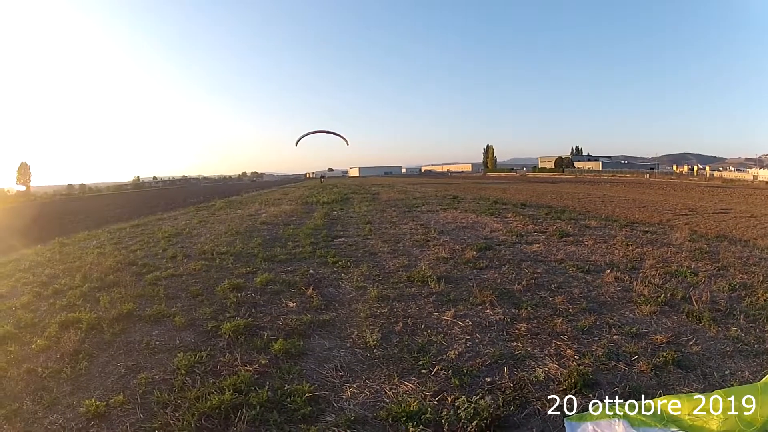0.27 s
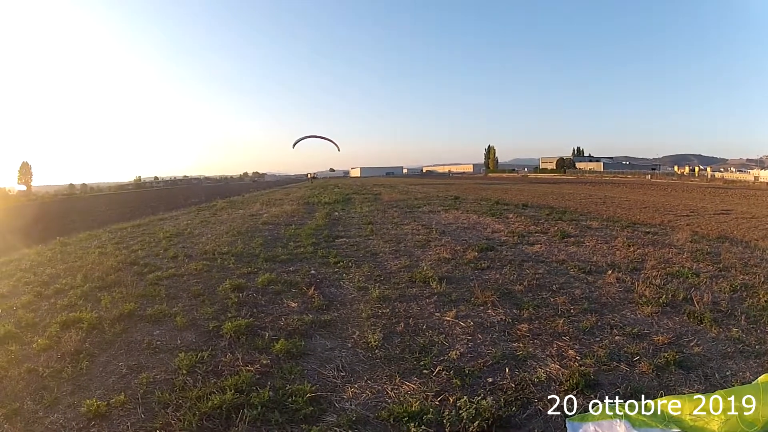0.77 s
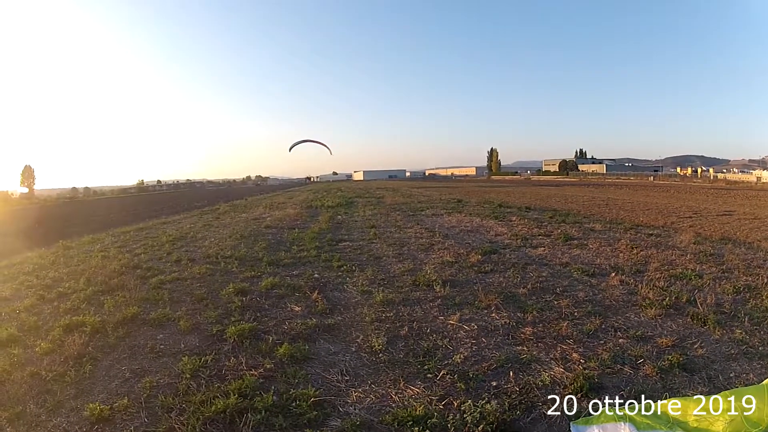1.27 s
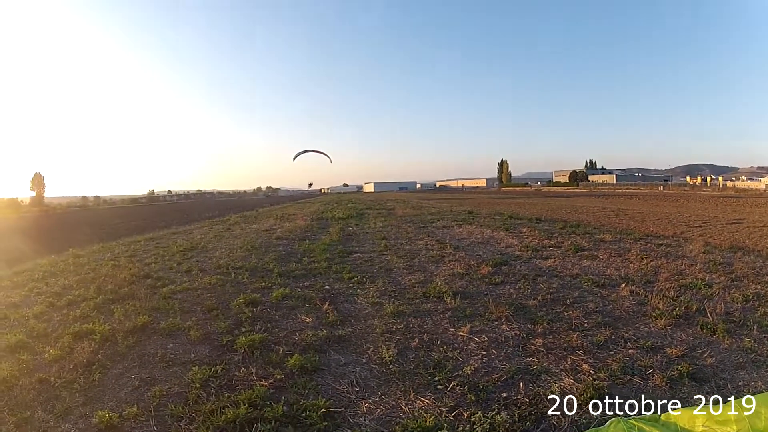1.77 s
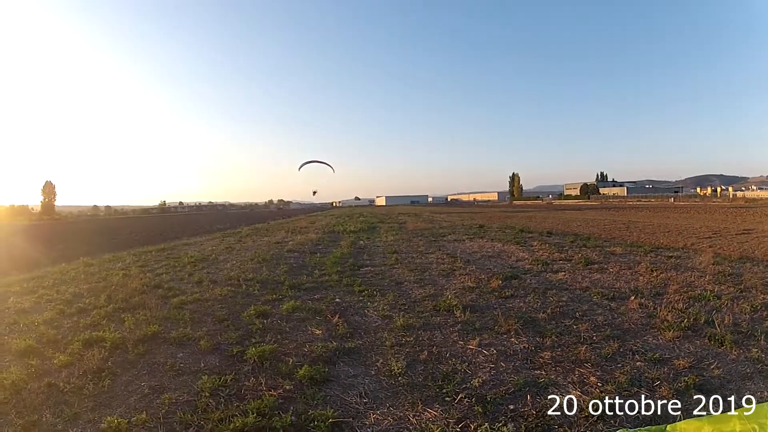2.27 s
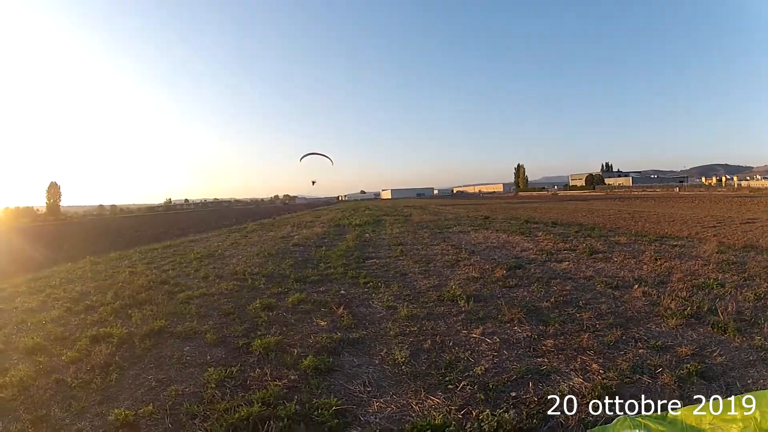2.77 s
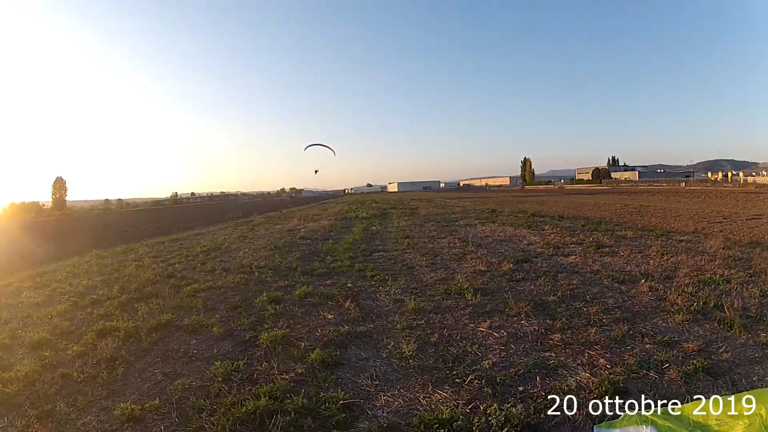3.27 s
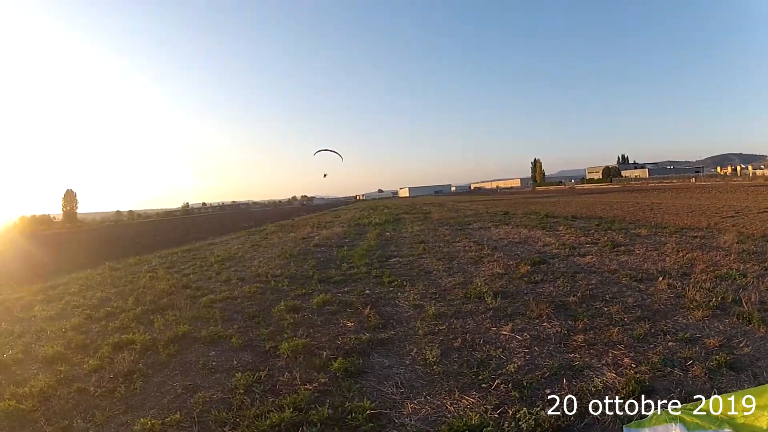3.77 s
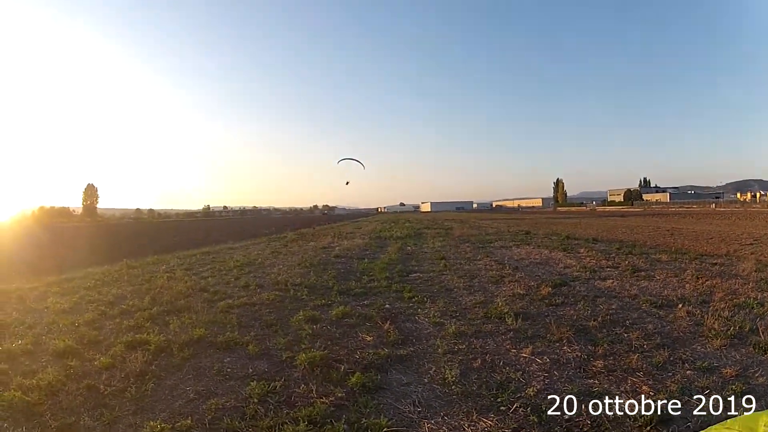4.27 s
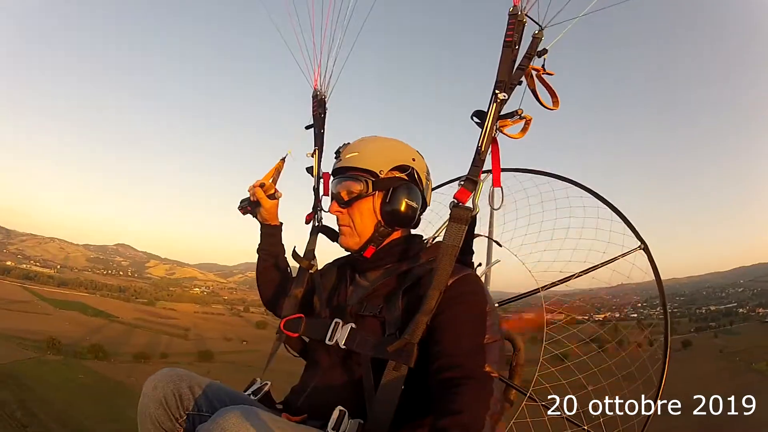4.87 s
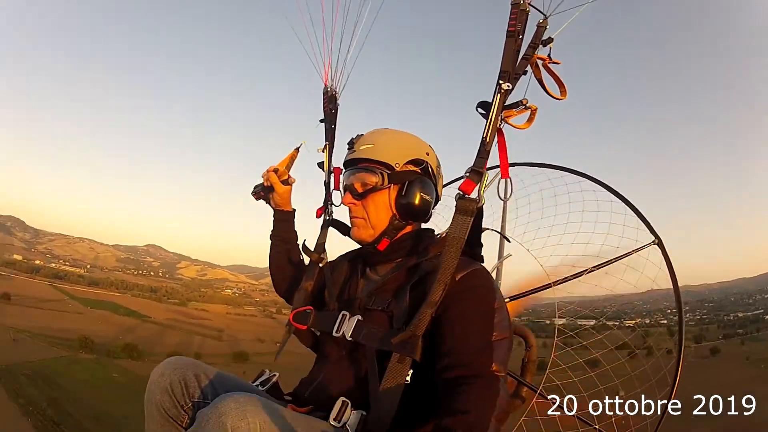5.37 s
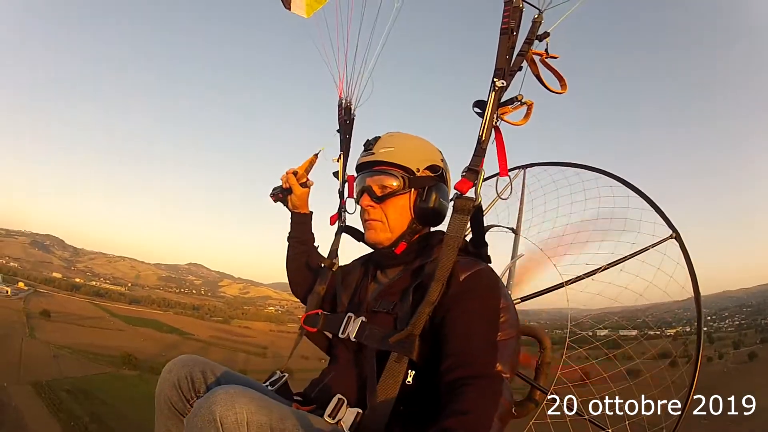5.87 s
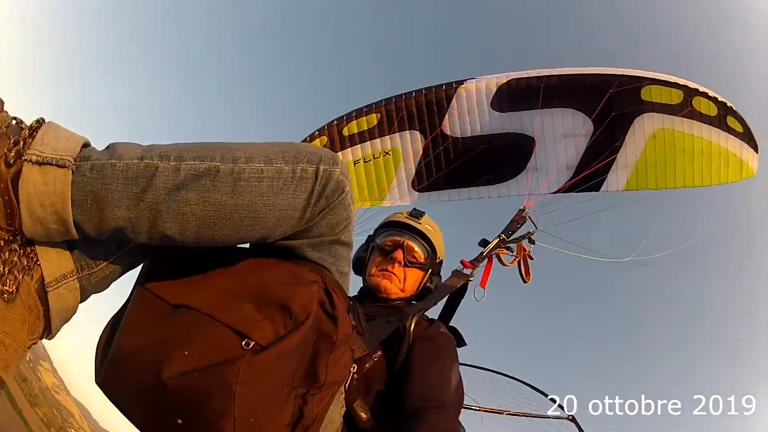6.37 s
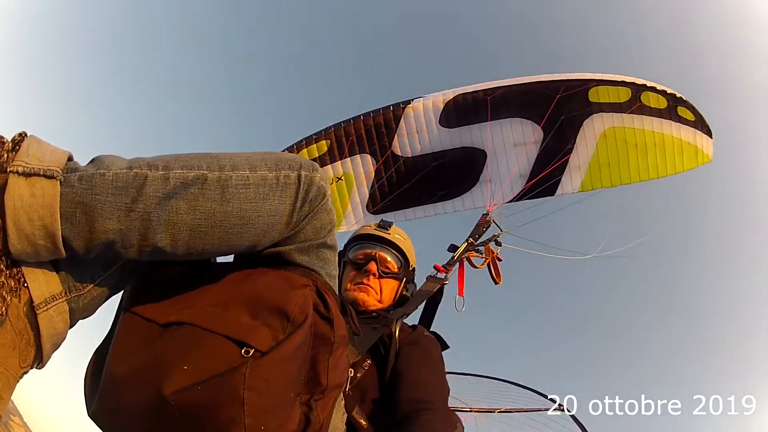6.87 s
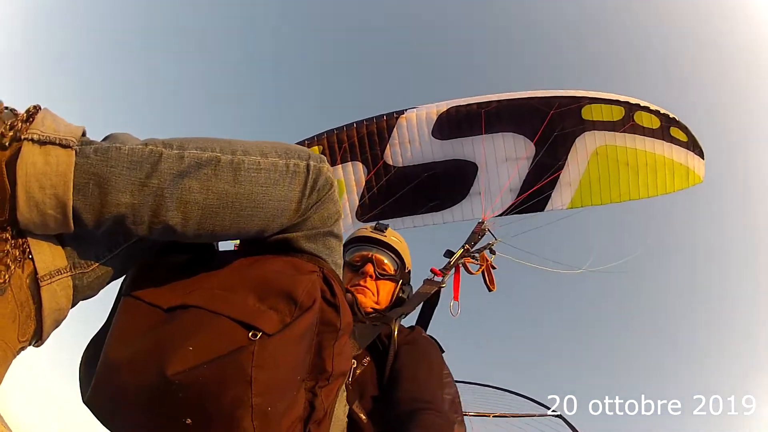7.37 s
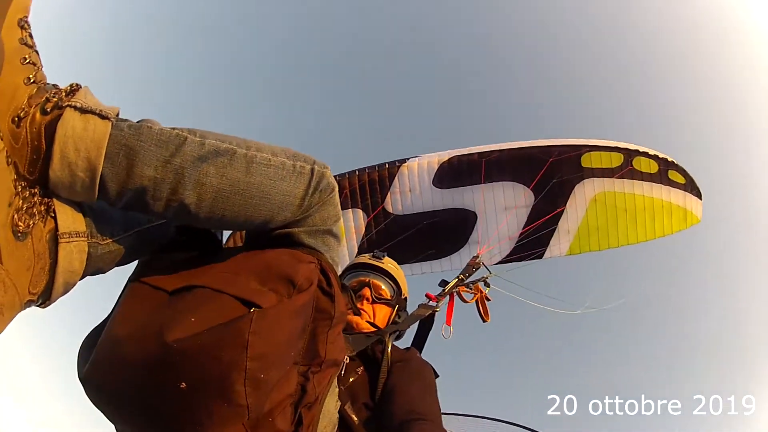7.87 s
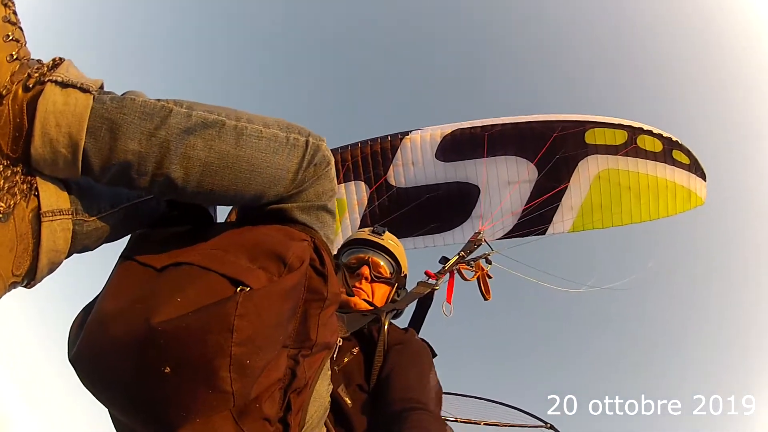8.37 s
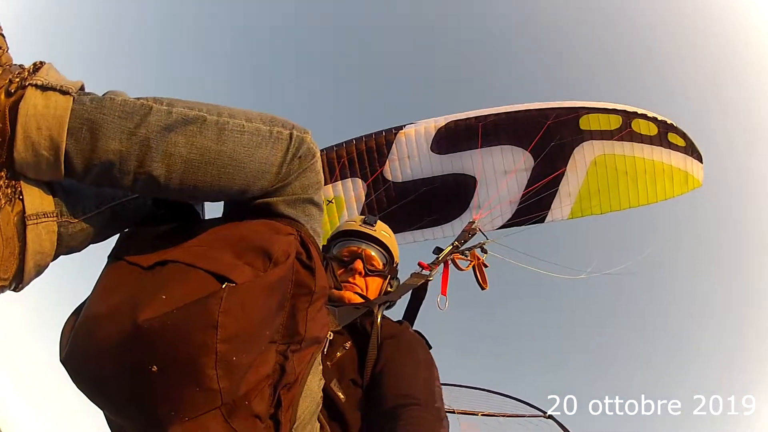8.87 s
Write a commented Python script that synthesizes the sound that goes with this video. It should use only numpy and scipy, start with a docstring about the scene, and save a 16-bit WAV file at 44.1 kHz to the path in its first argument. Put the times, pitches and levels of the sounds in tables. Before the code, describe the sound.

A paramotor's raspy propeller buzz recedes across an open field, easing in pitch, then cuts abruptly to a loud steady engine roar close up.

```python
"""A paramotor propeller, heard from a field as it flies off and eases the throttle; then, abruptly, on board,
first beside the pilot, then from below the seat. A two-stroke engine drives two blades through a reduction.
Each blade pass gives a pressure pulse, summed from harmonic orders, and bursts of torn air, made of noise
with an envelope locked to the blades; the exhaust note is chopped by the blades. A light breeze lies under
the field. The loudest peaks are flattened and a fixed tone colour is laid on the whole."""
import sys
import numpy as np
from scipy import signal
from scipy.fft import rfft, irfft
from scipy.io import wavfile

SR = 44100
rng = np.random.default_rng(int(sys.argv[2]) if len(sys.argv) > 2 else 0)


def generate_wav(signal):
    """Clip the signal to [-1, 1] and save it as 16-bit WAV at the path in sys.argv[1]."""
    frames = np.transpose(np.atleast_2d(signal))
    scaled = np.clip(frames, -1, 1) * 32767
    pcm = np.round(scaled).astype(np.int16)
    wavfile.write(sys.argv[1], SR, pcm)


N = 402191
TIME = np.arange(N) / SR   # s
BINS = np.maximum(np.fft.rfftfreq(N, 1 / SR), 1)   # Hz
BOARD_S, BELOW_S = 4.565, 6.241   # starts of the positions beside the pilot and below the seat
FIRINGS_PER_PASS_FIELD, FIRINGS_PER_PASS_BOARD = 1.464, 1.8

# course of the blade rasp from the field, before each layer's own offset: time_s, level_db
RASP_COURSE = [(0, -26.5), (0.45, -26.5), (1.1, -32.3), (2.05, -28), (2.5, -30), (2.8, -33.5), (3.3, -35),
               (3.9, -41), (4.55, -40)]


def amp(db):
    """Logarithmic level: decibels to amplitude gain."""
    return 10 ** (np.asarray(db) / 20)


def rms_one(x):
    """Normalisation by effective value: scale to unit rms."""
    return x / np.sqrt(np.mean(x ** 2) + 1e-20)


def in_time(rows):
    """Linear interpolation: the value column of a time curve at every sample."""
    s, value = np.transpose(rows)
    return np.interp(TIME, s, value)


def band(x, hz, kind):
    """Frequency selection by a Butterworth filter."""
    return signal.sosfilt(signal.butter(4, hz, kind, fs=SR, output="sos"), x)


def drift(rate):
    """Slow random modulation: unit-rms chance values, rate per second, joined by straight lines."""
    knots = rng.standard_normal(4000)
    return rms_one(np.interp(TIME * rate, np.arange(len(knots)), knots))


def coloured(white, spectrum):
    """Spectral shaping: give flat noise of unit rms a power density in dB per Hz."""
    hz, db = np.transpose(spectrum)
    density_db = np.interp(np.log(BINS), np.log(hz), db)
    return irfft(rfft(white) * amp(density_db), N) * np.sqrt(SR / 2)


def carved(x, bells):
    """Spectral colouring: bell-shaped dips and peaks over frequency."""
    db = sum(depth * np.exp(-.5 * ((BINS - hz) / width) ** 2) for hz, width, depth in bells)
    return irfft(rfft(x) * amp(db), N)


def ground_bounce(x, lag_ms, strength):
    """Comb-filter interference: the direct sound plus its slightly later echo off the field."""
    return irfft(rfft(x) * (1 + strength * np.exp(-2j * np.pi * BINS * lag_ms / 1000)), N)


def repeat(cycle, turns):
    """Periodicity: play one cycle once per turn."""
    return np.interp(turns % 1 * len(cycle), np.arange(len(cycle) + 1), np.append(cycle, cycle[0]))


def orders(table, turns, scatter, waver_db, swells=()):
    """Fourier synthesis of suction pulses: higher orders arrive less in step, and each wavers."""
    out = 0
    for order, db in table:
        db = db + waver_db * drift(9)
        for swell_order, s, width, rise_db in swells:
            if swell_order == order:
                db = db + rise_db * np.exp(-.5 * ((TIME - s) / width) ** 2)
        phase = rng.normal() * scatter * (order - 1)
        out = out - amp(db) * np.cos(2 * np.pi * order * turns + phase)
    return np.sqrt(2) * out   # an order at 0 dB has unit rms


def bursts(turns, depth_db, sharp, uneven_db):
    """Cyclic amplitude modulation: one swell per turn, each of its own strength; unit rms."""
    strength = rng.standard_normal(2000)[np.round(turns).astype(int)]
    swell = np.abs(np.cos(np.pi * turns)) ** (2 * sharp)
    return rms_one(amp(swell * (depth_db + uneven_db * strength)))


def torn_air(turns, alike, buzz_hz):
    """Partly coherent turbulence: flat noise whose power share alike, below buzz_hz, repeats every pass."""
    cycle = irfft(np.exp(2j * np.pi * rng.random(321)))
    repeated = rms_one(repeat(cycle, turns))
    fresh = rng.standard_normal(N)
    share = alike / (1 + (BINS / buzz_hz) ** 4)
    return irfft(rfft(fresh) * np.sqrt(1 - share) + rfft(repeated) * np.sqrt(share), N)


def receding(first_db, on_course_db):
    """Directivity and distance: a low tone shifts as the machine turns onto its course, then fades."""
    on_course_s, fade_db_per_s = 1.6, 3
    turn_db = np.interp(TIME, [0, on_course_s], [first_db, on_course_db])
    return amp(turn_db - fade_db_per_s * np.maximum(TIME - on_course_s, 0))


def breeze():
    """Low-frequency wind noise: a faint band of noise with a drifting level."""
    return amp(-58 + 3 * drift(3)) * rms_one(band(rng.standard_normal(N), [20, 70], "band"))


def field_exhaust(passes):
    """Amplitude modulation of a tone: the blades chop the exhaust note, which throws sum tones."""
    chop = 2 * np.pi * passes
    note = chop * FIRINGS_PER_PASS_FIELD
    tones = np.cos(note) + amp(-19) * np.cos(note + chop) + amp(-20) * np.cos(note + 2 * chop)
    return np.sqrt(2) * receding(first_db=-25.2, on_course_db=-27) * tones


def field_air(passes, far):
    """Modulated turbulence: rumble, rasp and hiss that flutter twice per blade pass, over a ground echo."""
    # relative spectra of the torn air, near and far: frequency_hz, density_db_per_hz
    air_near = [(25, -73), (60, -71), (130, -63), (250, -60), (430, -62.5), (750, -48), (1050, -52),
                (1600, -53), (2200, -62), (2700, -62), (3300, -71.5), (5000, -79), (7500, -83.5),
                (9700, -73), (14700, -78)]
    air_far = [(25, -83), (60, -86), (130, -74.5), (250, -69), (430, -68), (750, -56), (1050, -59),
               (1600, -76), (2200, -63), (2700, -74.5), (3300, -76.5), (5000, -85), (7500, -89),
               (9700, -79.5), (14700, -86.5)]
    # dips in the far torn air: frequency_hz, width_hz, gain_db
    far_dips = [(4200, 150, -5.5), (8000, 140, -3), (10580, 200, -28), (13400, 150, -20)]
    # course of the hiss, before its offset: time_s, level_db
    hiss_course = [(0, -24.5), (0.55, -29), (1.1, -32.5), (1.6, -29.5), (2.1, -32.5), (2.8, -31),
                   (3.4, -32), (3.7, -36), (4.55, -41.5)]
    rasp_db, hiss_db = in_time(RASP_COURSE), in_time(hiss_course)

    # a strong and a weak burst per pass, more clear-cut as the machine draws away
    depth_db = 11 + 6 * far
    strong = bursts(passes, depth_db, sharp=2.4, uneven_db=1.2)
    weak = bursts(passes + .5, depth_db, sharp=3.0, uneven_db=2.2)
    air = torn_air(passes, alike=.42, buzz_hz=3000) * (strong + .47 * weak)

    # the bounce path shortens with distance
    near = ground_bounce(coloured(air, air_near), lag_ms=1.023, strength=0.54)
    distant = ground_bounce(carved(coloured(air, air_far), far_dips), lag_ms=0.904, strength=0.35)
    air = (1 - far) * near + far * amp(5) * distant

    rumble = amp(rasp_db / 2 - 18.5) * rms_one(band(air, 377, "low"))
    rasp = amp(rasp_db - 5.5) * rms_one(band(air, [450, 1500], "band"))
    hiss = amp(hiss_db + 0.77) * rms_one(band(air, 1916, "high"))
    return rumble + rasp + hiss


def field_blades(passes, far):
    """Harmonic radiation of a propeller: low orders thrum, upper orders buzz along with the rasp."""
    # low blade orders: order, first_db, on_course_db
    thrum_orders = [(1, -31.5, -28), (2, -36.5, -28.5), (3, -22.5, -27.5)]
    # upper blade orders, near and far, relative to the buzz gain: order, level_db
    orders_near = [(4, -9.5), (5, -9.5), (6, -59), (7, -11), (8, -11), (9, -7), (10, -18), (11, -16),
                   (12, -15), (13, -14), (14, -33)]
    orders_far = [(4, -3.5), (5, -8), (6, -7.5), (7, -20.5), (8, -10), (9, -3), (10, -18.5), (11, -10.5),
                  (12, -21), (13, -17.5), (14, -21)]
    # orders that swell or fade as the disc turns against the listener: order, centre_s, width_s, rise_db
    swells = [(5, 0.11, 0.29, 6.5), (10, 0.19, 0.25, 17), (7, 0.89, .13, -16), (4, 1.1, 0.41, 6),
              (8, 1.3, 0.27, -2), (7, 1.64, 0.48, 8.5), (9, 2.2, 0.34, 3), (6, 2.1, 0.34, -8),
              (2, 2.57, .06, -13), (11, 2.7, 0.21, 11), (5, 2.68, 0.13, -15), (6, 3, 0.17, 6),
              (2, 3.03, 0.11, -26), (9, 3.22, 0.19, -12), (4, 3.44, 0.35, 5.5), (2, 3.62, 0.066, -19),
              (6, 3.53, 0.22, -12), (2, 4.26, .17, -14)]

    thrum = 0
    for order, first_db, on_course_db in thrum_orders:
        tone = orders([(order, 0)], passes, scatter=0.1, waver_db=0.63, swells=swells)
        thrum = thrum + receding(first_db, on_course_db) * tone

    near = orders(orders_near, passes, scatter=0.3, waver_db=1.44, swells=swells)
    distant = orders(orders_far, passes, scatter=0.38, waver_db=-0.5, swells=swells)
    buzz = np.sqrt(1 - far) * near + np.sqrt(far) * distant
    return thrum + amp(in_time(RASP_COURSE) - 3.5) * buzz


def from_field(passes):
    """Superposition at a distant listener: breeze, exhaust, torn air and blade tones."""
    far = np.interp(TIME, [1.6, 2.5], [0, 1])   # crossfade from near to far
    return breeze() + field_exhaust(passes) + field_air(passes, far) + field_blades(passes, far)


def board_exhaust(passes, table, level_db):
    """Modulated harmonic source: exhaust orders at the firing rate, chopped by the blades."""
    firings = passes * FIRINGS_PER_PASS_BOARD
    chop = 1 + .5 * np.cos(2 * np.pi * passes)
    return amp(level_db) * orders(table, firings, scatter=1.31, waver_db=0.5) * chop


def board_air(passes, spectrum, roar_db, hiss_db, swish_db, crack_db, alike):
    """Near-field turbulence: a roaring wake and a swish at every blade pass."""
    wake = rng.standard_normal(N) * bursts(passes, depth_db=3.5, sharp=0.75, uneven_db=1.1)
    wake = wake * amp(0.93 * drift(16))
    roar = amp(roar_db) * band(coloured(wake, spectrum), 1184, "low")

    # a short accent in each broad swish, as the blade cuts the wake of the frame;
    # a negative crack_db makes it a slight dip on average
    swish = bursts(passes, depth_db=swish_db, sharp=1.4, uneven_db=1.8)
    swish = swish * bursts(passes - .1, depth_db=crack_db, sharp=42.0, uneven_db=1.5)
    hiss = torn_air(passes, alike, buzz_hz=2800) * rms_one(swish)
    return roar + amp(hiss_db) * band(coloured(hiss, spectrum), 1180, "high")


def board_blades(passes, table, level_db):
    """Near-field blade loading: a pressure pulse per pass as a sum of orders."""
    return amp(level_db) * orders(table, passes, scatter=0.27, waver_db=1.0)


def beside_pilot(passes):
    """Superposition in the near field beside the pilot."""
    # blade orders, then exhaust orders, before their offsets: order, level_db
    blades = [(1, -20), (2, -23.5), (3, -29), (4, -22), (5, -20), (6, -25), (7, -20.5), (8, -32), (9, -38),
              (10, -26), (11, -56), (12, -49), (13, -46.5), (14, -35), (15, -42), (16, -41.5), (17, -44),
              (18, -39), (19, -51), (20, -38.5)]
    exhaust = [(1, -23.5), (2, -42), (3, -17.5), (4, -27.5), (5, -52), (6, -27)]
    # torn air, before its offsets: frequency_hz, density_db_per_hz
    air = [(25, -64), (60, -55), (130, -50), (250, -45), (430, -42.5), (750, -49), (1050, -61),
           (1600, -55.5), (2200, -57), (2700, -56), (3300, -65), (5000, -70), (7500, -73.5), (9700, -67),
           (14700, -70)]
    wash = board_air(passes, air, roar_db=0.5, hiss_db=0.0, swish_db=2.5, crack_db=6.0, alike=0.34)
    return board_exhaust(passes, exhaust, -5.0) + wash + board_blades(passes, blades, 0.5)


def below_seat(passes):
    """Superposition in the near field below the seat."""
    # blade orders, then exhaust orders, before their offsets: order, level_db
    blades = [(1, -14), (2, -17), (3, -22), (4, -25.5), (5, -28.5), (6, -34), (7, -39.5), (8, -31.5),
              (9, -28), (10, -35.5), (11, -29), (12, -36), (13, -39.5), (14, -53), (15, -39), (16, -47),
              (17, -43), (18, -54), (19, -58), (20, -45)]
    exhaust = [(1, -29), (2, -50), (3, -24), (4, -37), (5, -54), (6, -37)]
    # torn air, before its offsets: frequency_hz, density_db_per_hz
    air = [(25, -61), (60, -48), (130, -39), (250, -40), (430, -40.5), (750, -46), (1050, -60), (1600, -57),
           (2200, -55.5), (2700, -56), (3300, -64.5), (5000, -67.5), (7500, -72), (9700, -67), (14700, -71)]
    wash = board_air(passes, air, roar_db=-0.2, hiss_db=0.28, swish_db=7.0, crack_db=-0.5, alike=0.26)
    return board_exhaust(passes, exhaust, -0.5) + wash + board_blades(passes, blades, -0.75)


def blade_passes():
    """Phase as integrated rate: blade passes so far, with a slight jitter of the speed."""
    # propeller speed heard from the field as the throttle eases: time_s, passes_per_s
    field_speed = [(0, 90.01), (0.4, 90.35), (0.75, 90.79), (2, 91.46), (3, 89.95), (3.45, 87.93),
                   (3.8, 84.58), (4.3, 80.86), (4.55, 79.56)]
    # on board the speed is steady, with a slight creep below the seat
    beside_hz, below_hz, creep_hz_per_s = 66.45, 67.25, .053
    below = below_hz + creep_hz_per_s * (TIME - BELOW_S)
    board = np.where(TIME < BELOW_S, beside_hz, below)
    speed = np.where(TIME < BOARD_S, in_time(field_speed), board)
    return np.cumsum(speed * (1 + .001 * drift(25))) / SR


def scene():
    """Dependence on listening position: three places, one after the other, on one blade phase."""
    passes = blade_passes()
    field = from_field(passes)
    board = np.where(TIME < BELOW_S, beside_pilot(passes), below_seat(passes))
    # the level dips briefly just before the position moves below the seat
    dip_db, lead_s, width_s = -9, .0055, .0069
    dip = amp(dip_db * np.exp(-((TIME - BELOW_S + lead_s) / width_s) ** 2))
    return np.where(TIME < BOARD_S, field, dip * board)[None]


def record(dry):
    """Saturation and filtering: the loudest peaks flatten, a fixed tone colour is laid on, the top is cut."""
    # dips and peaks of the overall tone colour: frequency_hz, width_hz, gain_db
    tone_colour = [(6105, 336, -20), (5570, 310, -5.5), (10790, 370, -6), (11990, 120, -31),
                   (11560, 450, 1), (13100, 350, -2)]
    clipped = dry / (1 + np.abs(dry) ** 12) ** (1 / 12)
    top_cut = signal.ellip(10, .2, 80, 15150, fs=SR, output="sos")   # low-pass, edge in Hz
    return signal.sosfilt(top_cut, carved(clipped, tone_colour))


dry = scene()
out = record(dry)
generate_wav(out)
```